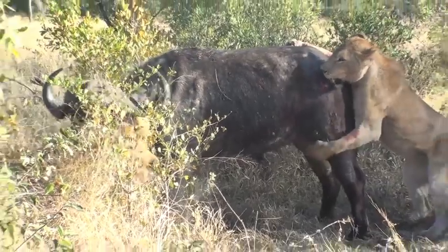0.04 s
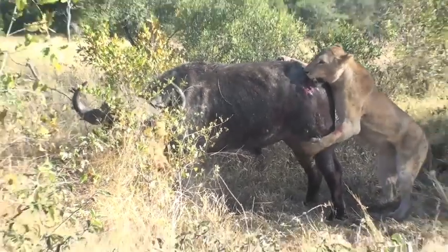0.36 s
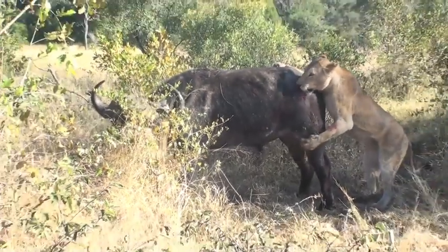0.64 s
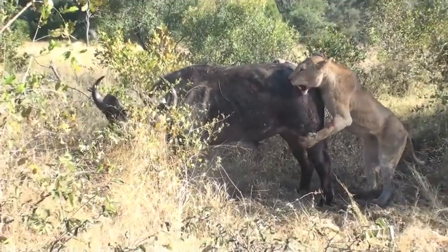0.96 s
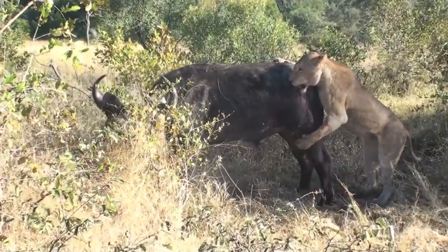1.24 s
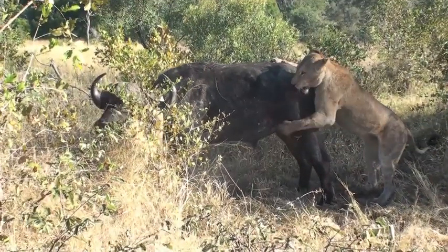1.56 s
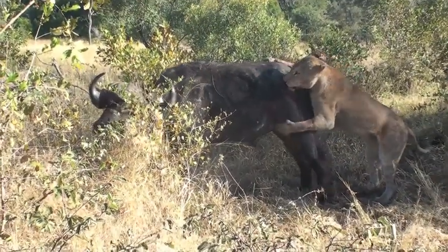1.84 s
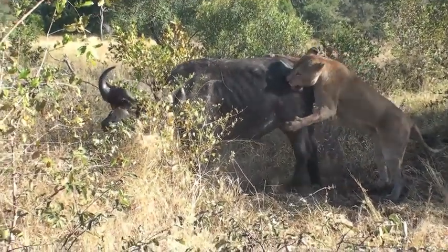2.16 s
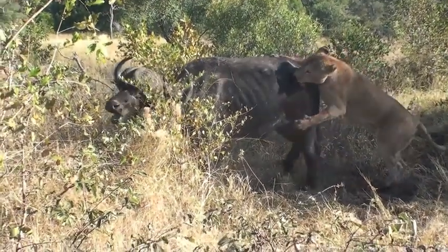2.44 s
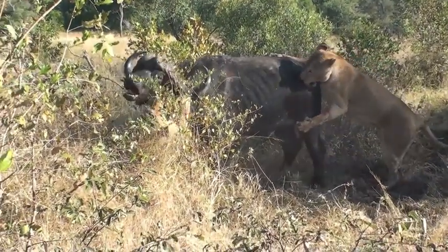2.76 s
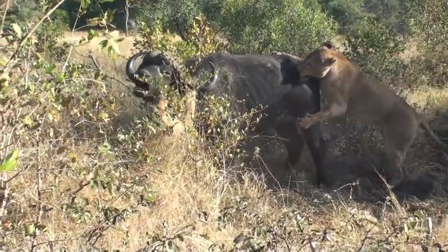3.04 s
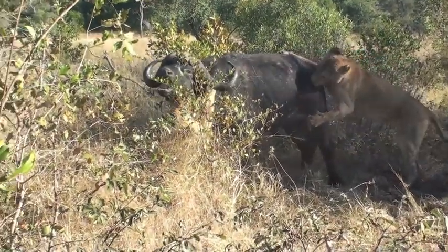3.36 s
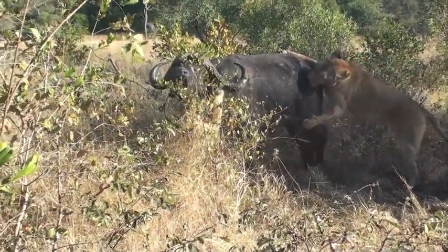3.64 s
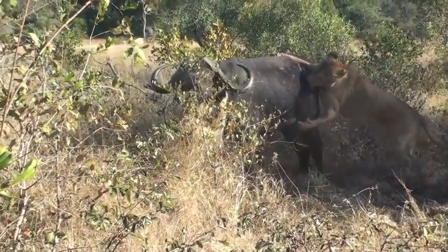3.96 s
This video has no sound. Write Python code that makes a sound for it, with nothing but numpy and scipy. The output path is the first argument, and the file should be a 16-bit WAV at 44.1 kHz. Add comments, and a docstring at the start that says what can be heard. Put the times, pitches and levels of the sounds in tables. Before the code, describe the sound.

A buffalo's rattling bellow starts at once, straight ahead, and sinks into a blast of breath around 1.3 seconds. Two soft pants follow, then a lull. From 2.5 seconds a lioness growls in slow, knocking pulses that break up into a hoarse rasp near 3.5 seconds. Dry grass rustles throughout, twigs snap near 0.2 and 2.8 seconds, and wind rumbles on the microphone.

```python
"""A buffalo's rattling bellow, straight ahead of the microphone in dry bush: a lioness hangs on it.
Throat pulses sound through its closing mouth and sink into a blast of breath. After a lull the
lioness growls in slow knocks that ring throat and chest, break up and end as a hoarse rasp.
Trampled grass rustles, twigs snap and wind rumbles on the microphone."""
import sys
import numpy as np
from scipy import signal
from scipy.fft import rfft, irfft, next_fast_len
from scipy.io import wavfile
from scipy.ndimage import map_coordinates

SR = 44100
rng = np.random.default_rng(int(sys.argv[2]) if len(sys.argv) > 2 else 0)


def master_out(mix):
    """Clip the mix to full scale and print it as 16-bit PCM to the path in sys.argv[1]."""
    frames = np.transpose(np.atleast_2d(mix))
    ceiling = np.clip(frames, -1, 1)
    pcm = np.round(ceiling * 32767).astype(np.int16)
    wavfile.write(sys.argv[1], SR, pcm)


N = 176400
PULSE_SIZE = 4096  # samples
TIME, PULSE_TIME = np.arange(N) / SR, np.arange(PULSE_SIZE) / SR
PULSE_HZ = np.fft.rfftfreq(PULSE_SIZE, 1 / SR)

# The beat of each animal's throat. Each row: time in seconds, pulses per second.
BELLOW_RATE = [(-.008, 72), (.139, 58.6), (.147, 44.3), (.308, 58.5), (.387, 66.8), (.75, 68), (.77, 62.8),
               (1.3, 67)]
GROWL_RATE = [(2.5, 34.25), (2.74, 32.03), (2.84, 28.14), (2.98, 30.38), (3.1, 21.42), (3.28, 26.04),
              (3.35, 34.16), (3.46, 23.81), (3.54, 35.44), (3.8, 20.09)]
# Noise from in front of the microphone. Each row: frequency in Hz, left-right likeness.
AHEAD = [(500, 0.79)]


def amp(db):
    """Decibels to gain."""
    return 10 ** (np.asarray(db) / 20)


def unit(x):
    """Scaled to rms 1."""
    return x / np.sqrt(np.mean(x ** 2) + 1e-20)


def along(points, hz):
    """A curve over frequency, read on a log axis."""
    knots_hz, values = np.transpose(points)
    return np.interp(np.log(hz + 1), np.log(knots_hz + 1), values)


def at(rows, s):
    """A curve over time, read at s seconds."""
    return np.interp(s, *np.transpose(rows))


def swell(rows):
    """Gain per sample from a curve in dB, silent outside it."""
    return amp(np.interp(TIME, *np.transpose(rows), left=-120, right=-120))


def wobble(rate):
    """A smooth random curve, rate knots a second."""
    knots = rng.standard_normal(int(N * rate / SR) + 4)
    return map_coordinates(knots, [TIME * rate])


def filtered(x, response):
    """x shaped by a function of frequency."""
    size = next_fast_len(N + SR // 2)
    hz = np.fft.rfftfreq(size, 1 / SR)
    return irfft(rfft(x, size) * response(hz), size)[..., :N]


def add(track, s, sound):
    """Mixes a sound in at s seconds."""
    part = track[max(round(s * SR), 0):][:len(sound)]
    part += sound[:len(part)]


def rush(colour, likeness, grain=1):
    """Coloured stereo noise of rms 1, its source gated by grain."""
    def mid_and_side(hz):
        angle = np.arccos(np.clip(along(likeness, hz), -1, 1)) / 2
        return amp(along(colour, hz)) * [np.cos(angle), np.sin(angle)]

    mid, side = filtered(grain * rng.standard_normal((2, N)), mid_and_side)
    return unit(np.array([mid + side, mid - side]))


def ring(spectrum_db, lead_s=0.001503, onset_s=.0007):
    """Pulse of peak 1 with the given spectrum: a rounded onset, then ringing."""
    cepstrum = irfft(np.log(amp(spectrum_db) + 1e-6))
    lag = np.fft.fftfreq(PULSE_SIZE) * PULSE_SIZE / SR
    causal = np.sign(lag) * (1 - np.exp(-(lag / onset_s) ** 2))  # puts the ringing after the peak
    pulse = irfft(np.exp(rfft(cepstrum * (1 + causal))))
    pulse = np.roll(pulse, round(lead_s * SR))
    pulse *= np.minimum(np.linspace(2, 0, PULSE_SIZE), 1)
    return pulse / np.abs(pulse).max()


def roughen(pulse, rough_db, t60):
    """The pulse followed by a dying burst of noise in its own colour."""
    burst = amp(-60 * PULSE_TIME / t60) * rng.standard_normal(PULSE_SIZE)
    tail = signal.fftconvolve(pulse, burst / np.linalg.norm(burst))[:PULSE_SIZE]
    return pulse + amp(rough_db) * tail


def beats(rate):
    """Pulse times in seconds, one in the middle of each throat cycle."""
    t = np.arange(rate[0][0], rate[-1][0], 1 / SR)
    cycles = np.cumsum(at(rate, t)) / SR
    return np.interp(np.arange(.5, cycles[-1]), cycles, t)


def puffs(rate, fade_s):
    """Airflow that jumps as the throat opens in each cycle, then fades."""
    out = np.zeros(N)
    for s in beats(rate):
        add(out, s, np.exp(-(PULSE_TIME / fade_s) ** 2))
    return out


def wet_hiss(rate, resonances, level, puff_s, depth_db=12, flicker_db=4):
    """Hiss that rides on the throat pulses and lasts between them; each resonance flares by itself."""
    air = amp(depth_db * puffs(rate, puff_s)) * rng.standard_normal(N)
    hiss = np.zeros(N)
    for centre, width in resonances:
        band = filtered(air, lambda hz: (1j * hz * width / (centre**2 - hz**2 + 1j * hz * width)) ** 2)
        hiss += amp(flicker_db * wobble(45)) * unit(band) / np.sqrt(centre)
    return swell(level) * unit(hiss)


def bellow(jitter_s=.0006, uneven_db=2, limp_from_s=.74, limp_db=5, flap_s=.0055, flap_db=-12):
    """The buffalo's throat pulses through a closing mouth, each trailed by a flap of the slack folds."""
    # The push behind the pulses. Each row: time in seconds, nominal peak in dB.
    effort = [(0, -3), (.16, -2.5), (.205, -13), (.24, -5), (.34, -3), (.38, -9), (.485, -11), (.51, -17),
              (.605, -10), (.69, -15), (.703, -7), (.75, -14.5), (.83, -16), (.9, -11), (1.09, -12),
              (1.21, -25), (1.262, -18), (1.3, -31)]
    # Four mouth shapes, numbered from 0. Each row: frequency in Hz, relative level in dB.
    gaping = [(60, -48), (210, -14), (304, -3), (400, -23.5), (563, -8), (829, 1.5), (997, -13.5),
              (1220, 1), (1340, -29.5), (1610, -17), (2260, -51), (2600, -23.5), (4500, -93)]
    pinched = [(50, -44), (273, -15), (360, -17), (483, -22.5), (1010, 8), (1200, -8), (1580, -32),
               (1970, -15.5), (2190, -74), (3080, -48), (4500, -92)]
    loose = [(50, -53), (100, -33), (210, 2), (407, -19), (635, -0.5), (732, -17.5), (881, 7.5),
             (1090, -1.5), (1360, 2.5), (1580, -31), (2700, -21.5), (4000, -85)]
    closing = [(50, -47), (100, -5), (290, -7), (383, -25), (710, 1), (1300, -16.5), (1540, -42),
               (1830, -21), (2400, -63)]
    # The mouth's movement. Each row: time in seconds, shape number (fractions blend).
    mouth = [(.15, 0), (.25, 1), (.35, 2), (.44, 2.5), (.88, 2.5), (1.03, 3)]
    shapes = (gaping, pinched, loose, closing)
    out = np.zeros(N)
    for k, s in enumerate(beats(BELLOW_RATE)):
        late, slack, tune, size = rng.standard_normal(4)
        shares = np.maximum(1 - np.abs(at(mouth, s) - np.arange(4)), 0)
        detuned_hz = PULSE_HZ * np.exp(0.036 * tune)
        colour = sum(share * along(shape, detuned_hz) for share, shape in zip(shares, shapes))
        db = at(effort, s) + uneven_db * size * shares[2:].sum()  # uneven once the mouth loosens
        if s > limp_from_s and k % 2 == 0:
            db -= limp_db
        pulse = -amp(db) * ring(colour)
        start = s + jitter_s * late
        add(out, start, pulse)
        flap = amp(flap_db) * roughen(pulse, rough_db=-2, t60=.03)
        add(out, start + flap_s * np.exp(0.298 * slack), flap)
    return out


def grass(trim_db=-1, crackle_db=3, clump_db=1.8):
    """Trampled dry stems crack in dense clumps: a rustle with a fine fizz on top."""
    # The course of rustle and fizz. Each row: time in seconds, level in dB before the trim.
    rustle_level = [(0, -37.5), (.2, -46.5), (.42, -46.5), (.85, -50), (1.38, -48.5), (1.58, -74),
                    (1.73, -52), (1.89, -65), (2.05, -54), (2.55, -52.5), (3.0, -40), (3.3, -37),
                    (3.5, -45), (3.72, -44), (3.83, -54.5)]
    fizz_level = [(.18, -52), (.36, -65), (.52, -58), (.8, -75), (1.65, -87), (1.9, -77), (2.06, -59),
                  (2.2, -64), (2.65, -60), (3.1, -48), (3.32, -47.5), (3.5, -66), (3.72, -51.5),
                  (3.82, -61.5)]
    # Their colours. Each row: frequency in Hz, relative level in dB.
    rustle_colour = [(1400, 5), (3300, -7), (4300, -5.5), (5100, -4.5), (6240, -7.5), (7600, -1.5),
                     (9500, -10), (12400, -58)]
    fizz_colour = [(7500, -48), (9500, -2.5), (11500, -6), (13000, -5), (16000, -11.5)]
    grain = amp(crackle_db * wobble(1500) + clump_db * wobble(70))
    rustle = amp(at(rustle_level, TIME)) * rush(rustle_colour, AHEAD, grain)
    fizz = amp(at(fizz_level, TIME)) * rush(fizz_colour, AHEAD, grain)
    return amp(trim_db) * (rustle + fizz)


def wind(trim_db=1, lumps_db=1.2):
    """Wind right on the microphone, rumbling differently at each port."""
    # Gusts. Each row: time in seconds, level in dB before the trim.
    gusts = [(0, -28.5), (.6, -30.5), (.84, -27), (1.3, -33), (1.6, -42.5), (1.68, -47), (2.45, -48),
             (2.7, -34.5), (3.3, -38), (3.8, -48.5)]
    # The rumble's colour. Each row: frequency in Hz, relative level in dB.
    colour = [(8, -36), (28, -6), (62, -0.5), (100, -4), (180, -9.5), (270, -20), (600, -60)]
    # What the two ports share. Each row: frequency in Hz, left-right likeness.
    likeness = [(30, 0.069), (100, 0.045), (250, 0.077)]
    db = at(gusts, TIME) + trim_db + lumps_db * wobble(23.05)
    return amp(db) * rush(colour, likeness)


def still_air(level_db=-54.5):
    """The faint, steady hush of the bush."""
    # The hush's colour. Each row: frequency in Hz, relative level in dB.
    colour = [(300, -7), (800, -6.5), (3000, -16), (12000, -26.5)]
    return amp(level_db) * rush(colour, AHEAD)


def nose_hiss():
    """The buffalo's nose is blown once a pulse and hisses on into the breath."""
    # Thin upper resonances of the nose. Each row: centre in Hz, width in Hz.
    resonances = [(3030, 620), (4250, 610), (5600, 390)]
    # The course of the hiss. Each row: time in seconds, level in dB.
    level = [(.1, -56), (.22, -47), (.5, -61.5), (.72, -57.5), (.85, -58), (1.1, -53.5), (1.3, -53.5),
             (1.5, -59)]
    return wet_hiss(BELLOW_RATE, resonances, level, puff_s=.005)


def twigs(slope_db_per_octave=13):
    """Dry twigs snap, each short crack around its own pitch."""
    # The snaps. Each row: start in seconds, peak in dB, centre in Hz.
    snaps = [(.164, -21, 4100), (.728, -39, 5500), (2.775, -25, 8450), (2.831, -28, 6760)]
    out = np.zeros(N)
    for s, db, centre in snaps:
        octaves_off = np.abs(np.log2((PULSE_HZ + 1) / centre))
        crack = roughen(ring(-slope_db_per_octave * octaves_off), rough_db=-2, t60=0.017)
        add(out, s, amp(db) * crack / np.abs(crack).max())
    return out


def throat_catches(waver=0.0337):
    """Either animal's throat briefly locks on one wavering tone: a groan, wheeze, grunt or squeak."""
    # The tones. Each row: middle in seconds, half-length in seconds, pitch in Hz, peak in dB.
    tones = [(0.417, 0.023, 664.7, -22.5), (1.143, 0.019, 3050, -48), (1.26, 0.008, 720, -24.5),
             (3.179, 0.015, 179, -25.5), (3.299, 0.0092, 195.4, -17.5), (3.382, 0.0036, 1810, -21.5)]
    out = np.zeros(N)
    for s, half_length, hz, db in tones:
        envelope = amp(db) * np.exp(-((TIME - s) / half_length) ** 2)
        cycles = hz * np.cumsum(1 + waver * wobble(250)) / SR
        out += envelope * np.sin(2 * np.pi * cycles)
    return out


def breath(flutter_db=2):
    """The buffalo blows out the rest of its air, then pants."""
    # The blast and the pants. Each row: time in seconds, level in dB.
    level = [(1.05, -45.5), (1.25, -35.5), (1.36, -38.5), (1.45, -44), (1.55, -66), (1.65, -61),
             (1.71, -45), (1.8, -50.5), (1.89, -60), (2.02, -46.5), (2.08, -55.5), (2.22, -59), (2.4, -86)]
    # The breath's colour. Each row: frequency in Hz, relative level in dB.
    colour = [(300, -14), (680, 2.5), (1000, -11.5), (1230, -8), (1540, -15), (2050, -11), (2500, -19),
              (5500, -23), (11000, -45)]
    return swell(level) * rush(colour, AHEAD, amp(flutter_db * wobble(90)))


def growl(slap_db=-3, stray_span_s=.028, tick_lead_s=0.00654, tick_db=-16):
    """The lioness's slow knocks, each announced by a tick; ever louder strays fall between them."""
    # The push behind the knocks. Each row: time in seconds, peak in dB.
    effort = [(2.5, -29), (2.575, -13), (2.635, -10), (2.695, -8), (2.727, -17), (2.757, -14), (2.79, -6),
              (2.825, -13), (2.89, -16), (2.93, -8.5), (2.96, -13), (2.997, -6.5), (3.06, -13.5),
              (3.19, -12), (3.26, -22), (3.32, -22.5), (3.36, -39)]
    # Her resonances. Each row: nominal pitch in Hz, relative level in dB, seconds to fall 60 dB.
    throat = [(614.5, 6.5, 0.052), (948, -7, 0.041), (1240, -7, 0.032), (1845, -24, 0.013),
              (3050, -40, 0.025), (3840, -43, 0.012), (4600, -31, 0.0093)]
    chest = [(162.8, -19, 0.28), (256, -7, 0.12)]
    # The slap that opens a knock. Each row: frequency in Hz, relative level in dB.
    slap_colour = [(60, -54.5), (150, -1), (500, -15), (1300, -11), (1950, -24.5), (2400, -74)]
    # Stray knocks. Each row: time in seconds, level in dB against the main knock.
    stray_level = [(2.6, -21.5), (2.8, -22), (2.97, -9.5), (3.08, 0.5), (3.3, 3.5)]
    slap, t = ring(along(slap_colour, PULSE_HZ)), PULSE_TIME

    def modes(table, tune):
        """Dying sines, struck a little differently each time."""
        return sum(amp(db + rng.normal(0, 0.48) - 60 * t / t60) * np.sin(2 * np.pi * hz * tune * t)
                   for hz, db, t60 in table)

    def knock(s, crest_s=2.755, rise_per_s=.3, sag_per_s=.15, chest_db_per_s=2):
        """A slap rings the body; its pitch climbs to a crest, then sinks as the chest gains weight."""
        before, after = max(crest_s - s, 0), max(s - crest_s, 0)
        tune = 1 - rise_per_s * before - sag_per_s * after + rng.normal(0, 0.022)
        body = modes(throat, tune) + amp(chest_db_per_s * after) * modes(chest, tune)
        onset = 1 - np.exp(-(t / 0.00088) ** 2)
        pulse = body * onset + amp(slap_db) * roughen(slap, rough_db=3.5, t60=0.021)
        return pulse / np.abs(pulse).max()

    out = np.zeros(N)
    for s in beats(GROWL_RATE):
        if s < effort[-1][0]:
            db = at(effort, s)
            add(out, s, amp(db) * knock(s))
            add(out, s - tick_lead_s, amp(db + tick_db + rng.normal(0, 11.05)) * slap)
            for late in rng.uniform(0.201, 1, size=2):
                add(out, s + late * stray_span_s, amp(db + at(stray_level, s)) * knock(s))
    return out


def rasp(depth_db=9):
    """Air chopped into puffs by the lioness's fluttering throat, loudest as the growl ends."""
    # The course of the rasp. Each row: time in seconds, level in dB.
    level = [(2.5, -63), (2.72, -57), (3.0, -41.5), (3.3, -44.5), (3.38, -31), (3.48, -29.5), (3.61, -36),
             (3.7, -43), (3.85, -51)]
    # Its hoarse colour. Each row: frequency in Hz, relative level in dB.
    colour = [(90, -34), (190, -3), (300, -21), (530, 4.5), (800, -4.5), (1030, -5.5), (1220, 0.5),
              (1550, -13), (1950, -16), (2240, -29), (2650, -11), (3100, -44), (4200, -24), (5100, -27),
              (6300, -39)]
    flutter = amp(depth_db * puffs(GROWL_RATE, fade_s=0.011))
    return swell(level) * rush(colour, AHEAD, flutter)


def mouth_grit():
    """Wet grit in the lioness's mouth, blown once a knock."""
    # Resonances of the grit. Each row: centre in Hz, width in Hz.
    resonances = [(1900, 450), (2900, 800), (4200, 604), (4900, 700)]
    # The course of its hiss. Each row: time in seconds, level in dB.
    level = [(2.55, -61), (2.68, -52), (2.95, -48), (3.25, -43), (3.42, -45), (3.55, -58)]
    return wet_hiss(GROWL_RATE, resonances, level, puff_s=.012)


def thicket(direct, wet_db=-16, t60=0.62):
    """The direct sound plus weak, short scatter from the bushes, different on each side."""
    t = np.arange(SR // 2) / SR
    tail = rng.standard_normal((2, len(t))) * amp(-60 * t / t60)
    scatter = signal.fftconvolve(direct[None], tail / np.linalg.norm(tail[0]), axes=1)[:, :N]
    return direct + amp(wet_db) * scatter


def scene():
    """Both animals straight ahead of the microphone, in grass and wind."""
    buffalo = bellow() + nose_hiss()
    lioness = growl() + mouth_grit()
    struggle = thicket(buffalo + lioness + throat_catches() + twigs())
    return struggle + rasp() + breath() + grass() + wind() + still_air()


def record(dry, top_hz=15800):
    """A stereo microphone whose left port leads, most in the midrange; nothing passes above top_hz."""
    # Phase between the ports. Each row: frequency in Hz, the left port's lead in radians.
    port_lead = [(50, 0.095), (400, .5), (2400, 0.24)]
    return filtered(dry, lambda hz: (hz < top_hz) * np.exp(.5j * along(port_lead, hz) * [[1], [-1]]))


dry = scene()
out = record(dry)
master_out(out)
```